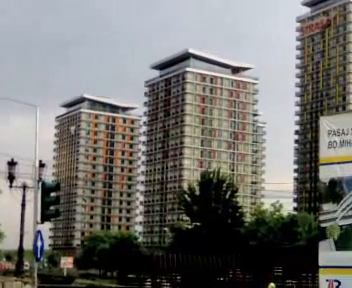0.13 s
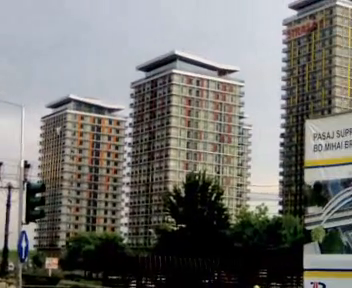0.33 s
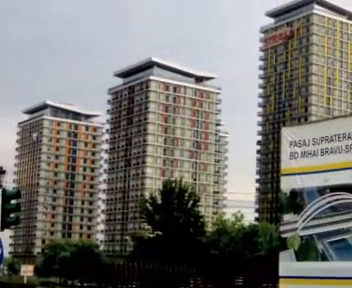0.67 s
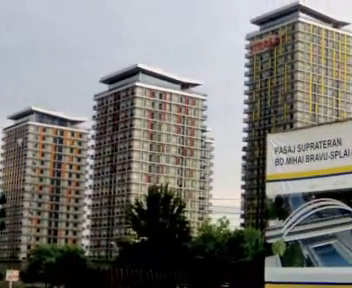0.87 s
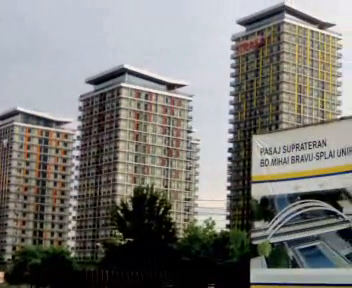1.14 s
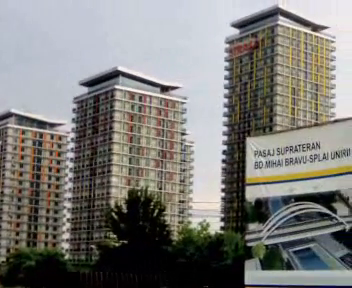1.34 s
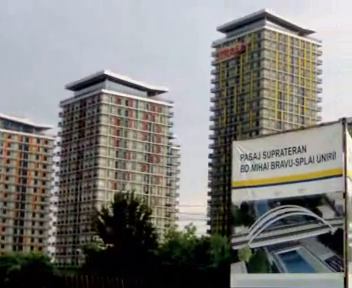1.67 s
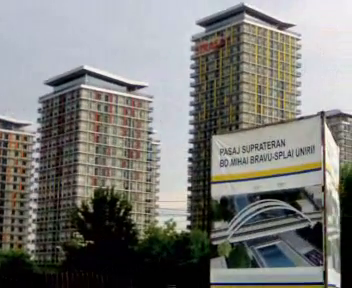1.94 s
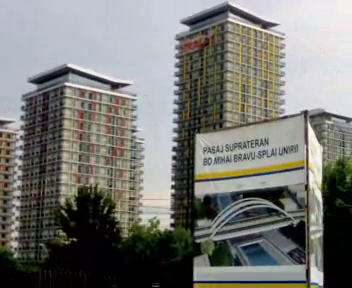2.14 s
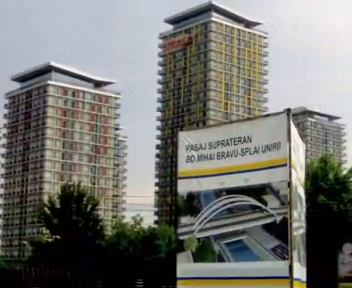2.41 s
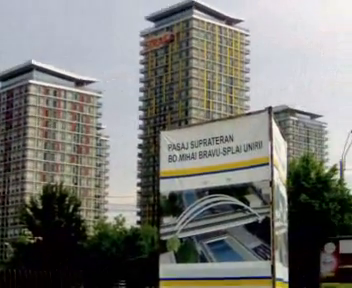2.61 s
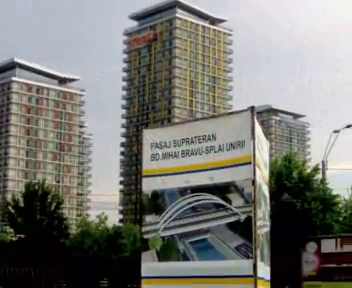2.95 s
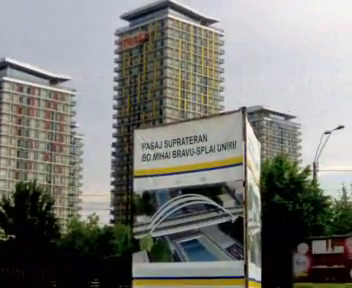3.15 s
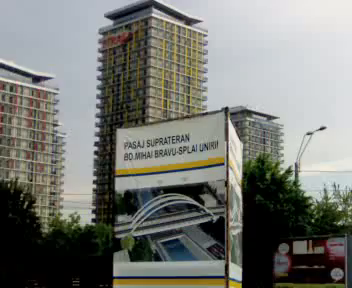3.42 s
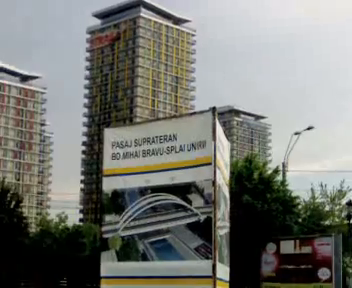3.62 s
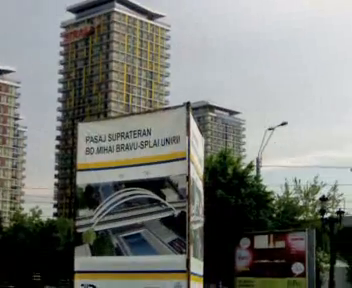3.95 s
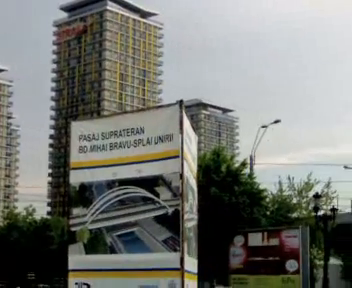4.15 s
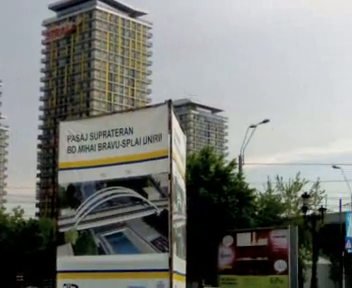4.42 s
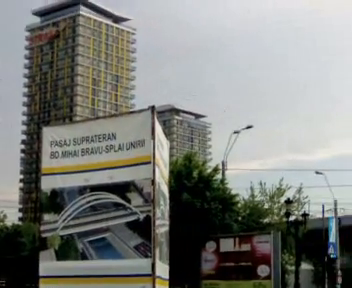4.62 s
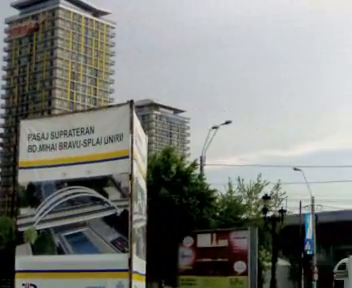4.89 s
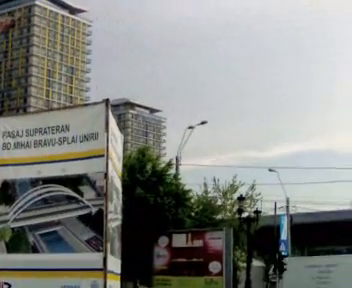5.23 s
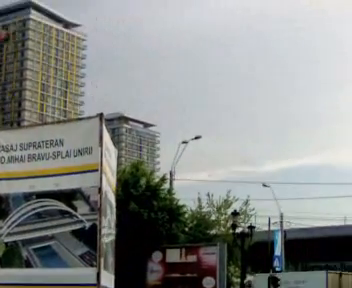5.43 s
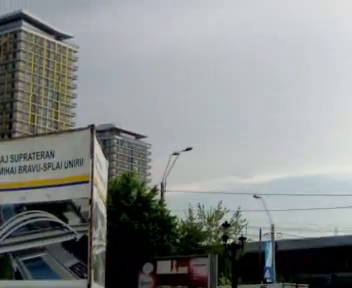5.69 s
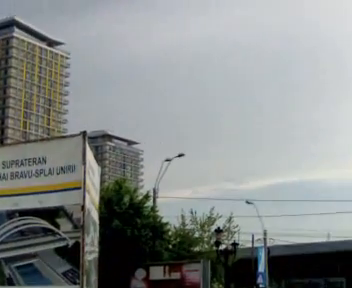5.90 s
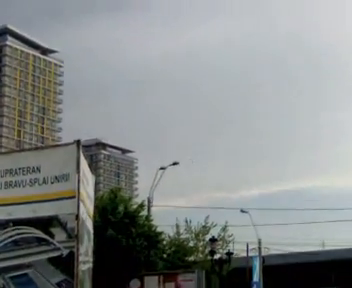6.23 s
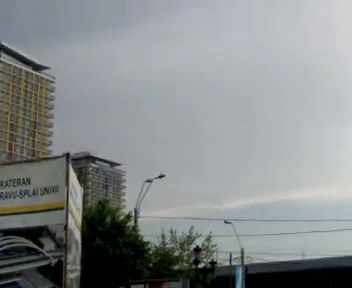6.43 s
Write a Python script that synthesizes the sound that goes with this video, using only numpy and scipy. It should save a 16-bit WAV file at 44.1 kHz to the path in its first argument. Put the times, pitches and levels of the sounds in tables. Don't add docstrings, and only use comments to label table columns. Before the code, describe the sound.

Steady overlapping wet traffic wash, with two bursts of clattering truck load, low engine drones and a few sharp water-drop ticks, slowly easing off.

```python
import sys
import numpy as np
from scipy import signal
from scipy.fft import rfft, irfft, next_fast_len
from scipy.io import wavfile
from scipy.ndimage import uniform_filter1d, map_coordinates

SR = 44100
rng = np.random.default_rng(int(sys.argv[2]) if len(sys.argv) > 2 else 0)


def invert_db(level):
    return 10 ** (np.asarray(level, dtype=float) / 20)


def generate_wav(sig):
    pcm = np.round(np.clip(np.atleast_2d(sig).T, -1, 1) * 32767).astype(np.int16)
    wavfile.write(sys.argv[1], SR, pcm)


N = 289296

# frequency in Hz, level in dB per Hz.
STREET_SPECTRUM = [(10, -14.5), (30, -5.5), (90, -8), (200, -9.5), (420, -13), (560, -9), (730, -4.5),
                   (1080, -7), (1520, -1.5), (2100, -5.5), (3700, -11.5), (5100, -6), (5900, -9),
                   (7400, -23)]
LAYER_BORDERS_HZ = [450, 1050, 2300, 4200, 5350, 6300]
# time of drawing level in seconds, slowness as a factor, weight, tread and spray in dB.
VEHICLES = [(.12, .68, -33.5, -26, -37.5), (.66, 0.11, -49, -42, -25.5), (1.02, 0.89, -32.5, -23, -24),
            (1.3, .1, -43, -24.5, -35.5), (1.96, .43, -49.5, -30.5, -34), (2.37, 0.79, -32.5, -27.5, -39.5),
            (3.46, 1.25, -30.5, -25.5, -25), (3.66, 0.2, -43.5, -32, -28), (4.57, .38, -42, -33.6, -30.5),
            (4.96, .54, -44.5, -32.5, -48.5), (5.66, 0.44, -49.5, -43.5, -40.3),
            (6.15, 0.23, -43, -49, -41)]
PASS_PARTS = [
    (-0.3, 0.33),
    (0, 0.21),
    (0.28, 0.29),
]
# time in seconds, level in dB.
FAR_STREET = [(0, -31.5), (2, -32.5), (4, -32.5), (5.2, -34.5), (6.56, -35.5)]
# nose, body, wake and far street in dB.
LAYER_GAINS_DB = [
    (-9.5, -4, -20, -4),
    (-5.5, 1.7, -4, 0.35),
    (-0.5, -14, -0.5, 2.5),
    (-5.5, -2.5, -3.5, -0.0),
    (-8, -11.5, -0.7, -1.2),
    (-2, -18.2, -7.5, -7),
    (-6.5, -26.5, -15, -11.8),
]
# start and end in seconds, first and last delay in ms, strength 0-1.
FLANK_ECHOES = [
    (.55, 1.08, 1.06, .31, .36),
    (2.95, 3.56, .8, .19, .2),
]
# start in seconds, contact gap in seconds, peak in dB, ring in Hz, boom in dB.
LOAD_JOLTS = [
    (.071, .014, -9, 1300, -12),
    (.133, .022, -13, 1220, -24),
    (.209, .012, -12, 1320, -13),
    (.254, .006, -15, 1555, -20),
    (2.04, .015, -10, 760, -21),
    (2.116, .023, -12, 700, -16),
    (2.236, .011, -7, 740, -18),
    (2.321, .02, -6, 850, -13),
    (2.383, .022, -14, 910, -22),
    (2.518, .019, -12, 900, -17),
]
# frequency in Hz, width in Hz, level in dB.
RATTLE_RESONANCES = [
    (725, 106, 8),
    (1500, 720, 2.5),
]
# time in seconds, frequency in Hz, level in dB.
ENGINE_TONES = [
    [(.2, 64.34, -42), (.5, 65.2, -37.5), (1, 64.86, -46.5), (2.4, 65, -42), (2.7, 64.8, -45)],
    [(2.9, 57.6, -43), (3.35, 57.3, -39), (3.47, 57.2, -29), (3.69, 57.3, -34), (3.8, 57.3, -28),
     (4.83, 58, -35), (4.98, 58.4, -45), (5.15, 58.5, -35), (5.55, 58.5, -43)],
    [(4.8, 32, -50), (5.1, 32.1, -36.5), (5.7, 33.15, -36), (6.3, 33.5, -34), (6.56, 32.5, -48)],
    [(3, 34, -45), (3.17, 37, -31), (3.3, 40.7, -41)],
]
# multiple of the firing frequency, level in dB.
ENGINE_ORDERS = [
    [(1, 0), (2, -2), (3, -10)],
    [(1, 0), (2, -12), (3, -13)],
    [(1, -0.5), (2, -12), (3, -18)],
    [(1, 2), (2, -3.5), (3, -12)],
]
# time in seconds, peak in dB, frequency in Hz.
NEAR_DROPS = [
    (1.793, -9, 4600),
    (2.3473, -7, 2840),
    (2.4688, -19, 5160),
    (3.367, -4.5, 5500),
    (5.452, -19.5, 4830),
    (5.7707, -11.5, 5100),
    (6.377, -15, 4700),
]


def unit(x):
    return x / np.sqrt(np.mean(x ** 2) + 1e-20)


def along(points, hz):
    f, v = np.transpose(points)
    return np.interp(np.log(hz + 1), np.log(f + 1), v)


def curves(rows):
    s, *columns = np.transpose(rows)
    return [np.interp(np.arange(N) / SR, s, column) for column in columns]


def wobble(rate_hz):
    knots = rng.standard_normal(int(N * rate_hz / SR) + 4)
    return map_coordinates(knots, [np.arange(N) * rate_hz / SR])


def filtered(x, response):
    m = next_fast_len(N + SR // 2)
    return irfft(rfft(x, m) * response(np.fft.rfftfreq(m, 1 / SR)), m)[..., :N]


def above(hz, edge_hz, octaves):
    return 1 / (1 + np.exp(-np.log2((hz + 1) / edge_hz) / octaves))


def rush(lo_hz, hi_hz, patchy_db, grain_db):
    droplets = invert_db(grain_db * wobble(900)) * rng.standard_normal(N)
    z = signal.stft(droplets, nperseg=512)[2]
    patches = uniform_filter1d(rng.standard_normal(z.shape), 6, 0)
    patches = unit(uniform_filter1d(patches, 10, 1))
    noise = signal.istft(z * invert_db(patchy_db * patches), nperseg=512)[1][:N]

    def slice_response(hz):
        share = above(hz, lo_hz, 0.09) * (1 - above(hz, hi_hz, 0.13))
        return invert_db(along(STREET_SPECTRUM, hz)) * np.sqrt(share)

    return unit(filtered(noise, slice_response))


def passing(layer, column):
    cars = np.array(VEHICLES)
    *parts_db, far_db = LAYER_GAINS_DB[layer]
    t = np.arange(0, N + 64, 64) / SR
    u = (t - cars[:, :1]) / cars[:, 1:2]
    shape = 0
    for db, (after, half) in zip(parts_db, PASS_PARTS):
        shape = shape + invert_db(2 * db) / (1 + abs((u - after) / half) ** 3.5)
    far_power = invert_db(2 * (np.interp(t, *np.transpose(FAR_STREET)) + far_db))
    power = invert_db(2 * cars[:, column]) @ shape + far_power
    return np.interp(np.arange(N) / SR, t, np.sqrt(power))


def tyres():
    a, b, c = LAYER_BORDERS_HZ[:3]
    flutter_db = 0.3 * wobble(9) + 0.3 * wobble(30)
    rumble = invert_db(2.5) * passing(layer=0, column=2) * rush(8, a, patchy_db=1.0, grain_db=0.74)
    drone = passing(layer=1, column=2) * rush(a, b, patchy_db=0.56, grain_db=0.5)
    roar = passing(layer=2, column=3) * rush(b, c, patchy_db=0.47, grain_db=1.4)
    return invert_db(flutter_db) * (rumble + drone + roar)


def flank():
    t, delay_ms, strength = np.arange(N) / SR, np.zeros(N), np.zeros(N)
    for start, end, first_ms, last_ms, top in FLANK_ECHOES:
        u = (t - start) / (end - start)
        on = (u > 0) & (u < 1)
        delay_ms = delay_ms + on * (first_ms + (last_ms - first_ms) * u)
        strength = strength + on * top * np.sqrt(abs(np.sin(np.pi * u)))
    return delay_ms, strength


def water():
    a, b, c, d = LAYER_BORDERS_HZ[2:]
    swish = passing(layer=3, column=4) * rush(a, b, patchy_db=0.16, grain_db=1.0)
    hiss = passing(layer=4, column=4) * rush(b, c, patchy_db=1.7, grain_db=1.0)
    fizz = passing(layer=5, column=4) * rush(c, d, patchy_db=0.4, grain_db=0.9)
    mist = passing(layer=6, column=4) * rush(d, 8200, patchy_db=2.7, grain_db=-1.5)
    wet = (swish + hiss + fizz + mist) * invert_db(0.28 * wobble(9) + 0.33 * wobble(30))
    delay_ms, strength = flank()
    late = map_coordinates(wet, [np.arange(N) - delay_ms * SR / 1000])
    return (wet + strength * late) / np.sqrt(1 + strength ** 2)


def ring(times_s, peaks_db, freqs_hz, t60_s, rough):
    out, t = np.zeros(N + SR), np.arange(SR // 12) / SR
    for s, db, hz in zip(times_s, peaks_db, freqs_hz):
        phase = 2 * np.pi * hz * t + rough * np.cumsum(rng.standard_normal(len(t)))
        envelope = invert_db(db - 60 * t / t60_s) * (1 - np.exp(-t * hz * 2))
        out[round(s * SR):][:len(t)] += envelope * np.sin(phase)
    return out[:N]


def jolts():
    rattle, boom = [], []
    chance = rng.standard_normal((len(LOAD_JOLTS), 3, 4))
    for (s, gap_s, db, hz, boom_db), draws in zip(LOAD_JOLTS, chance):
        for k, (a, b, c, d) in enumerate(draws):
            at = s + k * gap_s
            contact_db = db - 1.5 * k
            upper_hz = min(1.9 * hz, 1750)
            rattle.append((at, contact_db + c, hz * np.exp(0.08 * a)))
            rattle.append((at + 0.003, contact_db - 3 - c, upper_hz * np.exp(0.08 * b)))
            boom.append((at, boom_db - 5 * (2 - k), 139 * np.exp(0.22 * d)))
    return np.transpose(rattle), np.transpose(boom)


def truck():
    (s, db, hz), (boom_s, boom_db, boom_hz) = jolts()
    scrape = ring(s, db - 0.5, hz, t60_s=0.059, rough=1.5)

    def rattle_colour(f):
        total = 0
        for k, (centre_hz, width_hz, gain_db) in enumerate(RATTLE_RESONANCES):
            damping = 1j * f * width_hz
            resonance = damping / (centre_hz * centre_hz - f * f + damping)
            total = total + (-1) ** k * invert_db(gain_db) * resonance
        return total

    part = ring(s, db - 4, hz, t60_s=0.03, rough=0.1)
    body = ring(boom_s, boom_db + 2, boom_hz, t60_s=0.052, rough=0.015)
    return filtered(scrape, rattle_colour) + part + body


def engines():
    out, t = 0, np.arange(N) / SR
    for rows, orders in zip(ENGINE_TONES, ENGINE_ORDERS):
        hz, db = curves(rows)
        edge_s = np.minimum(t - rows[0][0], rows[-1][0] + 0.12 - t)
        fade = np.clip(edge_s / 0.092, 0, 1)
        phase = 2 * np.pi * np.cumsum(hz * (1 + 0.0054 * wobble(8.6))) / SR
        tone = sum(invert_db(g + 0.74 * wobble(3.9)) * np.sin(k * phase) for k, g in orders)
        out = out + fade * invert_db(db + 1.5) * tone
    return out


def drops():
    s, db, hz = np.transpose(NEAR_DROPS)
    return ring(s, db - 4, hz, t60_s=0.012, rough=0.25)


def scene():
    return (tyres() + water() + truck() + engines() + drops())[None]


def gain_control(x, depth_db):
    power = abs(uniform_filter1d(x ** 2, size=400))
    usual = abs(uniform_filter1d(x ** 2, size=9000))
    jump = np.maximum(np.log10(power / usual), 0)
    fall = np.exp(-np.arange(SR // 5) / (0.056 * SR))
    after = signal.fftconvolve(np.pad(jump, (350, 0)), fall / fall.sum())[:N]
    return x * invert_db(-depth_db * after)


def treble_gate(x):
    hz, _, z = signal.stft(x, SR, nperseg=4096)
    size = uniform_filter1d(abs(z), size=4, axis=0)
    loudness = np.sqrt(np.sum(abs(z) ** 2, axis=0))
    kept = (size > invert_db(-52) * loudness) | (hz[:, None] < 7150)
    return signal.istft(z * kept, SR, nperseg=4096)[1][:N]


def low_pass(x):
    return signal.sosfilt(signal.butter(12, 9190, fs=SR, output="sos"), x)


def record(dry):
    nyquist_hz = 8000
    slope = [(7300, 0), (7500, -5.5), (7700, -26.5), (7800, -90)]  # (Hz, dB)
    leak = [(8300, -9.5), (8500, -14.5), (8700, -23), (9000, -35.0), (9200, -59), (9300, -120)]  # (Hz, dB)
    x = gain_control(dry[0], depth_db=13.0)
    x = treble_gate(filtered(x, lambda hz: invert_db(along(slope, hz))))
    mirror = x * 2 * np.cos(2 * np.pi * 2 * nyquist_hz * np.arange(N) / SR)
    image = filtered(mirror, lambda hz: invert_db(along(leak, hz)) * (hz > nyquist_hz))
    mix = x + image - 0.0102
    return low_pass(mix[None])


dry = scene()
out = record(dry)
generate_wav(out)
```